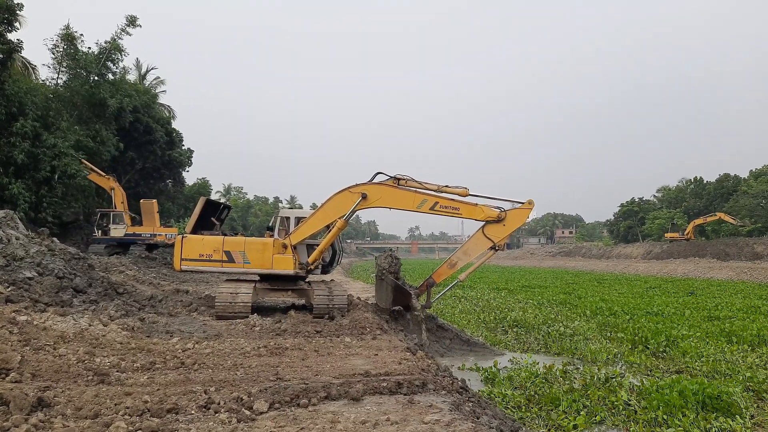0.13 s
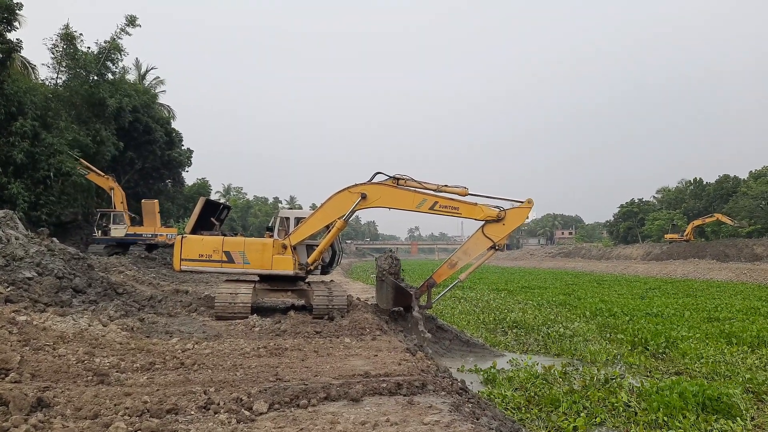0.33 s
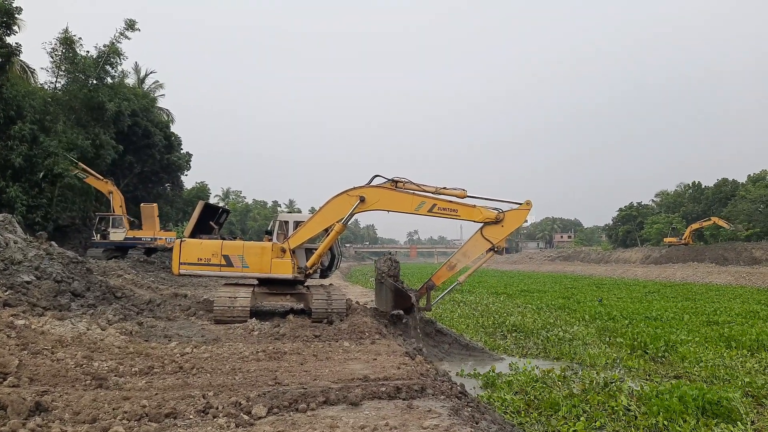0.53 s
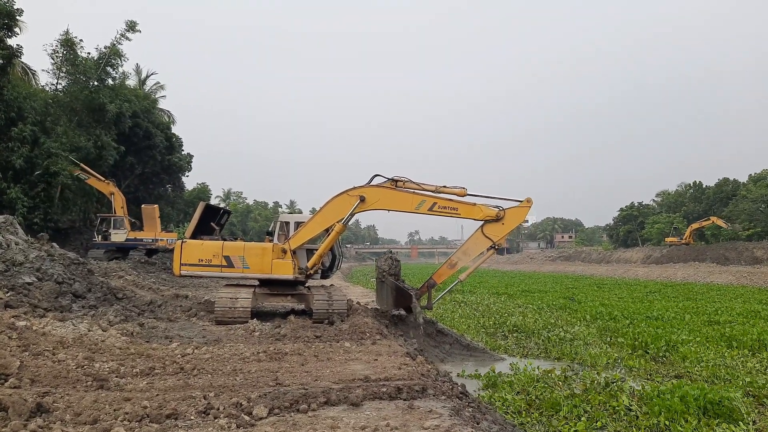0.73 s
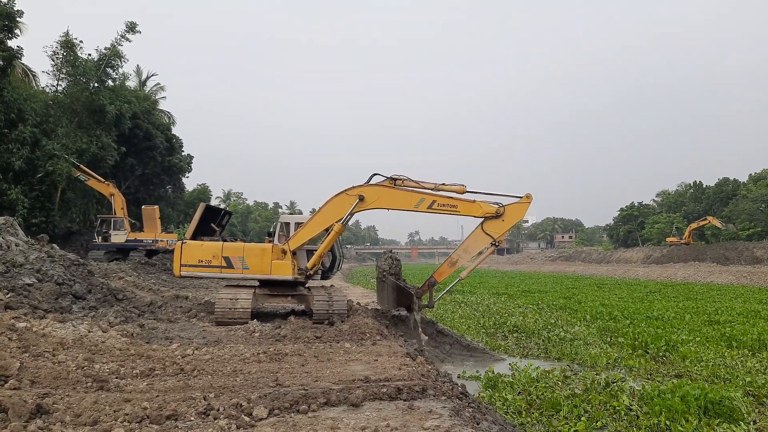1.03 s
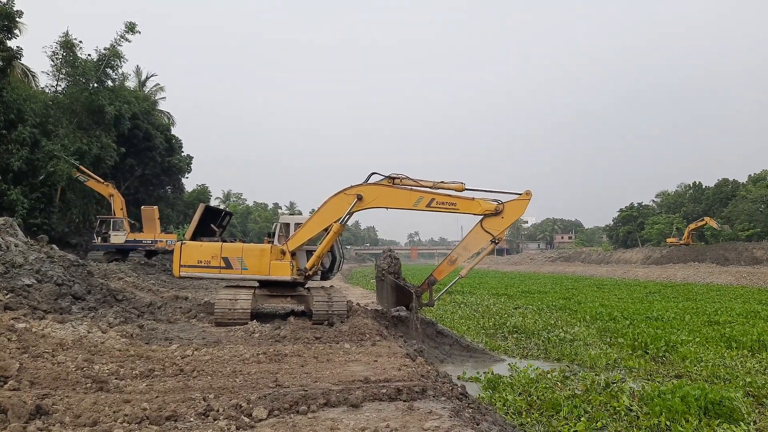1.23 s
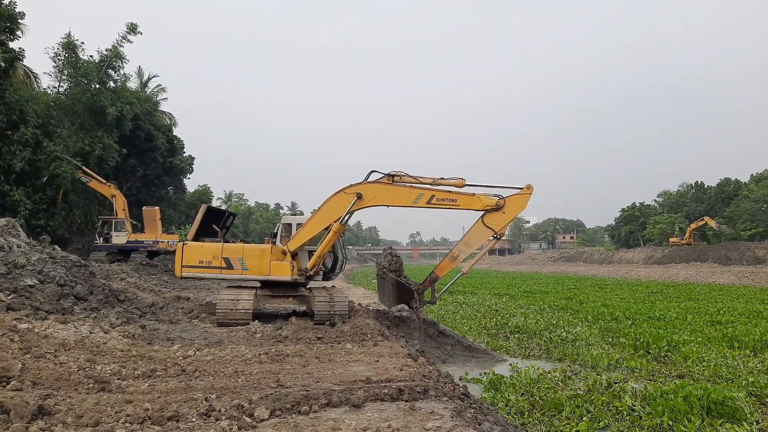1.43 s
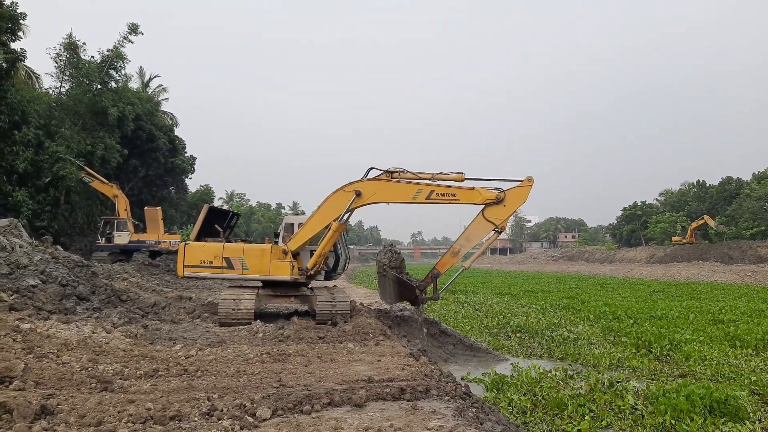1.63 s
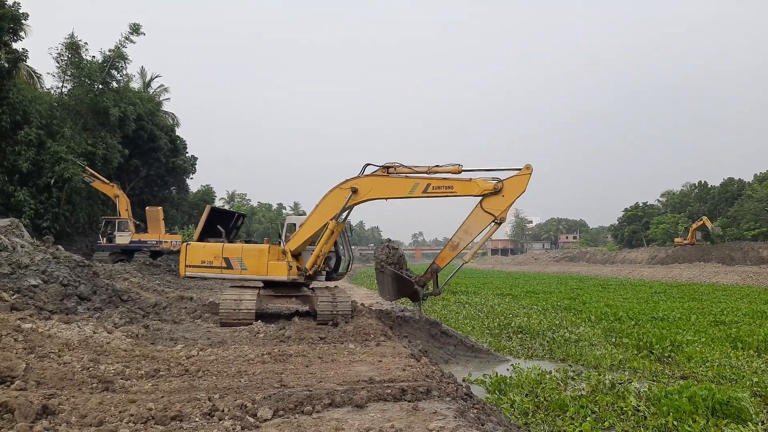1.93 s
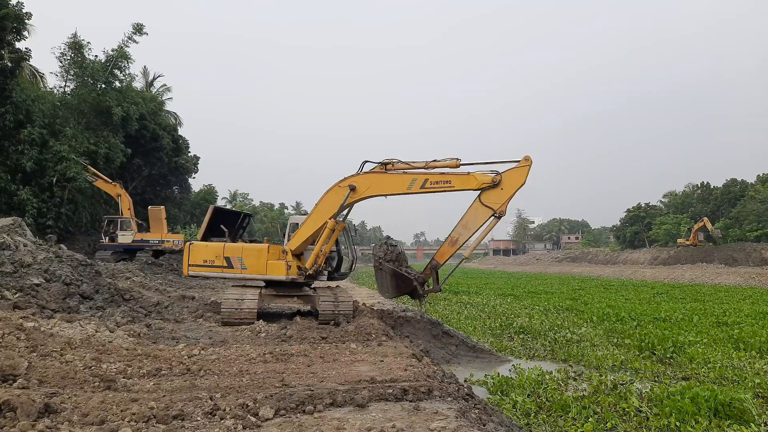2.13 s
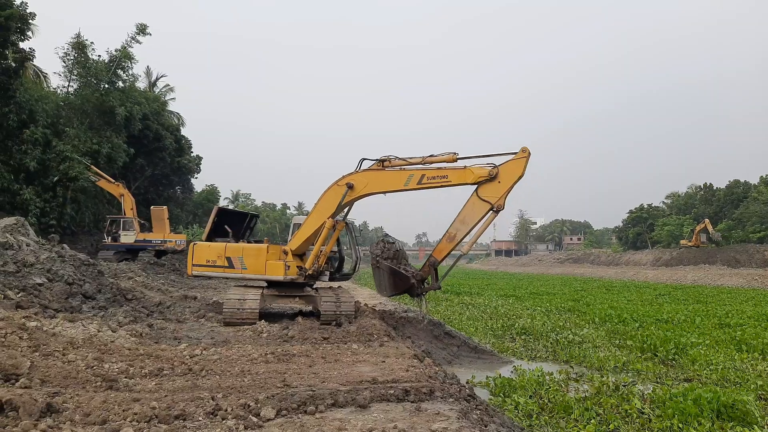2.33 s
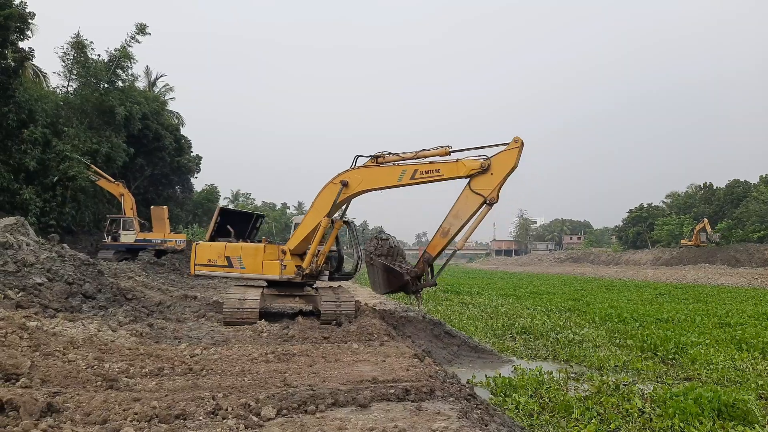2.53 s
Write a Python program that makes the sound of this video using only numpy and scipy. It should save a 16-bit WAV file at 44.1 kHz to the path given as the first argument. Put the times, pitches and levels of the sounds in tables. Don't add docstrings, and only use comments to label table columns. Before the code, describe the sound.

A diesel excavator engine drones close by on an open riverbank, low and steady with soft airy hiss, sagging slightly in pitch; two brief metallic clanks come past the middle, captured in stereo from a few steps away.

```python
import sys
import numpy as np
from scipy import signal
from scipy.io import wavfile
from scipy.ndimage import uniform_filter1d

SR = 44100
rng = np.random.default_rng(int(sys.argv[2]) if len(sys.argv) > 2 else 0)


def undo_db(level):
    steps = np.asarray(level, float) / 20
    return 10 ** steps


def persist_wave(psi):
    counts = np.round(np.clip(psi, -1, 1) * 32767).astype(np.int16)
    wavfile.write(sys.argv[1], SR, np.atleast_2d(counts).T)


N = 118629


def read(hz, f, value):
    return np.interp(np.log(hz + 1), np.log(np.add(f, 1)), value)


def evened(x):
    return x / np.sqrt(np.mean(abs(x) ** 2) + 1e-20)


def waver(rate_hz):
    rows = rng.random((24, 2))
    hz = rate_hz * (0.053 + 0.95 * rows[:, :1])
    coarse = np.arange(0, N + 256, 256)
    wave = np.sin(2 * np.pi * (hz * coarse / SR + rows[:, 1:])).sum(0) / np.sqrt(12)
    return np.interp(np.arange(N), coarse, wave)


# t/s, firing rate f/Hz, exhaust level/dB, fan level/dB, pump level/dB
SHAFT = [(0, 72.37, -30, -28.5, -29.5), (.2, 72.6, -33, -27.5, -44), (.4, 72.26, -54, -28.5, -44.5),
         (.6, 72.4, -30, -28.5, -48.5), (.75, 72.97, -27.5, -26.5, -42), (.98, 72.9, -21.5, -28.5, -43),
         (1.15, 71.8, -25.5, -29, -40.5), (1.35, 71.48, -23, -33, -37), (1.549, 70.55, -23.5, -31, -40),
         (1.72, 69.71, -22, -31, -38), (1.92, 69.57, -26.5, -32.5, -38), (2.15, 69.07, -29.5, -58, -34),
         (2.3, 69.2, -28.5, -35, -31.5), (2.5, 68.83, -23.5, -44, -29.5), (2.69, 68.8, -21.5, -22.5, -27.5)]


def control(column):
    table = np.array(SHAFT)
    return np.interp(np.arange(N) / SR, table[:, 0], table[:, column])


USUAL_DB = (-28, -31, -38.5)
START = (-.19, 3.0, .12)
PORT_LAG_S = 0.00024


def orders(table, level_db, usual_db, turns):
    out = np.zeros((2, N))
    for multiple, db, share, waver_db in table:
        followed_db = usual_db + db + share * (level_db - usual_db)
        level = np.sqrt(2) * undo_db(followed_db + waver_db * waver(9.0))
        jitter = 0.012 * waver(8.0)
        lag = multiple * 72 * PORT_LAG_S / 4
        between_ports = np.outer([1, -1], 0.0038 * waver(8.0) + lag)
        out += level * np.cos(2 * np.pi * (multiple * turns + jitter + between_ports))
    return out


# multiple of firing rate, level/dB, share of control followed, waver/dB
EXHAUST = [(1, 0.0024, 1, 0.71), (5 / 3, -18, 0.14, 2.7), (7 / 3, -18, 0.14, 3.2), (3, -26.5, -0.15, 4)]


def exhaust(turns):
    return orders(EXHAUST, control(column=2), USUAL_DB[0], turns + START[0])


# multiple of firing rate, level/dB, share of control followed, waver/dB
FAN = [(1.0525, -4, .1, .6), (2.105, 0, 1, .4), (5.29, -14, .2, 3)]


def fan(turns):
    return orders(FAN, control(column=3), USUAL_DB[1], turns + START[1])


# multiple of firing rate, level/dB, share of control followed, waver/dB
PUMP = [(3, -2.5, 1, 1.7), (6, -1, 0.17, 4.1), (9, -14.5, -0.98, 2.3), (12, -9.5, -0.74, 1.16)]


def pump(turns):
    return orders(PUMP, control(column=4), USUAL_DB[2], turns + START[2])


# multiple of firing rate, level/dB, share of control followed, waver/dB
EXHAUST_OCTAVE = [(2, -8, 1.2, .6)]


def exhaust_octave(turns):
    return orders(EXHAUST_OCTAVE, control(column=3), USUAL_DB[1], turns + START[0])


# f/Hz, likeness [0-1], right phase [rad], left minus right level/dB
PORTS = [(70, 0.95, 0, -.5), (302, 1, 0, -0.8), (580, 0.59, 0.1, -1.5), (930, 0.77, -0.45, -3),
         (1160, 0.73, -2.06, -2), (1820, 0.7, -1.5, -1.5), (2410, 0.38, -3, 1), (3500, 0.41, -2.5, -3),
         (5470, 0.44, -6, -4), (8200, .2, -5.5, 1.5), (11600, 0.15, -16, 3.5), (14100, 0.21, -14, 0)]


def noise(colour_db, turn=None):
    hz = np.fft.rfftfreq(1024, 1 / SR)
    a, b, c, d, patches = rng.standard_normal((N // 256 + 5, 513, 5)).T
    patches = uniform_filter1d(patches, size=14, axis=0)
    patches = evened(uniform_filter1d(patches, size=10, axis=1))
    f, same, phase, lean_db = np.transpose(PORTS)
    same = np.clip(read(hz, f, same), 0, 1)[:, None]
    phase = read(hz, f, phase)[:, None] if turn is None else turn
    lean = undo_db(read(hz, f, lean_db) / 2)[:, None]
    left = a + 1j * b
    right = same * left * np.exp(1j * phase) + np.sqrt(1 - same ** 2) * (c + 1j * d)
    z = np.array([left * lean, right / lean])
    z = z * undo_db(colour_db(hz)[:, None] + 0.7 * patches)
    return evened(signal.istft(z, nperseg=1024, noverlap=768)[1][:, :N])


# f/Hz, level/dB per Hz
ROAR = [(15, -46), (25, -33), (57, -6.5), (152, -4.5), (257, -14), (429, -10.5), (578, -17), (874, -14.5),
        (1300, -45.5), (1690, -52), (2860, -120)]
# f/Hz, level/dB per Hz
HISS = [(680, -20), (1150, 0.5), (2190, -7.5), (2580, -8.5), (3040, -10.5), (5300, -14), (9870, -22),
        (14300, -21.5), (15600, -26)]
# f/Hz, width/Hz, level/dB, right phase [rad]
PANELS = [(387, 130, -41, -0.5), (809, 340, -42, 0.3), (1014, 173, -41, -1.34), (2585, 330, -48, -1.2),
          (1510, 320, -48.5, -2), (5260, 660, -58.5, -4)]
ROAR_DB, HISS_DB, SWAY_DB = -30.5, -39, 0.35


def roar_colour(hz):
    return read(hz, *np.transpose(ROAR)) - 30 * np.log2(np.maximum(hz / 1300, 1))


def hiss_colour(hz):
    return read(hz, *np.transpose(HISS)) - 30 * np.log2(np.maximum(1150 / (hz + 1), 1))


def block(turns):
    uneven = undo_db(1.6 * rng.standard_normal((200, 1))[turns.astype(int) % 200, 0])
    knock = uneven * np.exp(-(turns % 1) / 0.5)
    knock = uniform_filter1d(knock / knock.mean(), size=40)
    roar = noise(roar_colour)
    hiss = noise(hiss_colour)
    out = undo_db(ROAR_DB + SWAY_DB * waver(5.08)) * roar * (0.88 + 0.16 * knock)
    out += undo_db(HISS_DB + SWAY_DB * waver(12.0)) * hiss * (0.9 + 0.15 * knock)
    for hz0, width_hz, db, turn in PANELS:
        ring = noise(lambda hz: -20 * np.log10(1 + (2 * (hz - hz0) / width_hz) ** 2), turn=turn)
        out += undo_db(db + 2 * SWAY_DB * waver(10.0)) * ring * (0.96 + 0.073 * knock)
    return out


# f/Hz, level/dB
FAR = [(81.4, -37), (101.6, -42.5), (121.2, -48.5), (168.4, -52)]


def far_machine():
    t = np.arange(N) / SR
    out = np.zeros(N)
    for hz, db in FAR:
        level = np.sqrt(2) * undo_db(db + 3.2 * waver(3.75))
        out += level * np.sin(2 * np.pi * (hz * t + 0.17 * waver(2.94)))
    return out


RATTLE_HZ = (900, 4000)


def clanks(hits, modes, lag_s):
    t = np.arange(9000) / SR
    out = np.zeros((2, N + 9000))
    band = signal.butter(4, RATTLE_HZ, "bandpass", fs=SR)
    onset = np.minimum(t / 0.0021, 1)
    for s, db, lean_db, rattle_db, rattle_t60 in hits:
        ring = np.zeros(len(t))
        for hz, mode_db, t60 in modes:
            ring += undo_db(mode_db - 60 * t / t60) * np.sin(2 * np.pi * (hz * t + rng.random()))
        grains = undo_db(2.1 * rng.standard_normal(len(t) // 90).repeat(90))
        shared, *own = rng.standard_normal((3, len(t))) * grains
        for side in range(2):
            rattle = evened(signal.lfilter(*band, shared + 0.92 * own[side]))
            rattle = rattle * undo_db(rattle_db - 60 * t / rattle_t60)
            at = round((s + side * lag_s) * SR)
            level = undo_db(db + lean_db * (0.5 - side))
            out[side, at:at + len(t)] += level * (ring + rattle) * onset
    return out[:, :N]


# f/Hz, level/dB, t60/s
PLATE = [(754, 0, .14), (1351, -2, .07), (2690, -9, .13), (2900, -12, .05), (1800, -7, .05)]
# t/s, level/dB, left minus right level/dB, rattle level/dB, rattle t60/s
PLATE_HITS = [
    (0., -47, 0., 8, .6),
    (1.523, -42, 0., -4, .12),
    (1.644, -31, -1.5, -10, .12),
    (1.657, -33, 3, -11, .22),
    (1.742, -47, 0., -3, .15),
]


def plate_clanks():
    return clanks(PLATE_HITS, PLATE, lag_s=0.00034)


# f/Hz, level/dB, t60/s
PIN = [(3305, 0, .17), (4570, -11, .2), (2400, -16, .1)]
# t/s, level/dB, left minus right level/dB, rattle level/dB, rattle t60/s
PIN_HITS = [
    (1.625, -33, -3, -18, .15),
    (1.645, -40, -4, -9, .14),
]


def pin_clanks():
    return clanks(PIN_HITS, PIN, lag_s=0.00002)


# f/Hz, level/dB, t60/s
LINK = [(964, 0, .07), (1475, -11, .04), (2900, -12, .04), (3300, -10, .035), (4414, -3, .028),
        (4480, -21, .2)]
# t/s, level/dB, left minus right level/dB, rattle level/dB, rattle t60/s
LINK_HITS = [
    (1.8335, -29, -3, -10, .04),
]


def link_clanks():
    return clanks(LINK_HITS, LINK, lag_s=0.00005)


def scene():
    turns = np.cumsum(control(column=1)) / SR
    tones = exhaust(turns) + fan(turns) + pump(turns) + exhaust_octave(turns) + far_machine()
    tones = tones * undo_db(np.array([[-0.25], [0.25]]))
    return tones + block(turns) + plate_clanks() + pin_clanks() + link_clanks()


def top_cut(x):
    return signal.sosfilt(signal.butter(12, 15810, fs=SR, output="sos"), x)


def record(dry):
    bass_cut = signal.butter(2, 55.4, "highpass", fs=SR, output="sos")
    treble_cut = signal.firwin(1023, 15500, window=("kaiser", 9), fs=SR)
    heard = signal.sosfilt(bass_cut, dry)
    heard = signal.oaconvolve(heard, treble_cut[None], "same")
    return top_cut(heard)


dry = scene()
out = record(dry)
persist_wave(out)
```